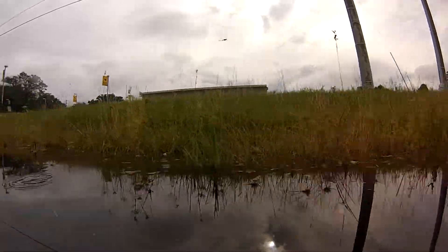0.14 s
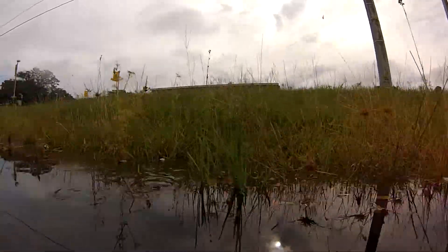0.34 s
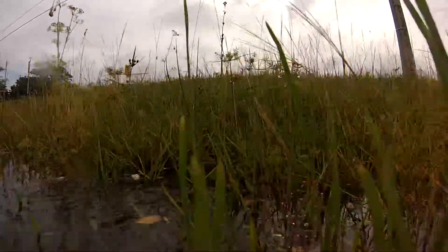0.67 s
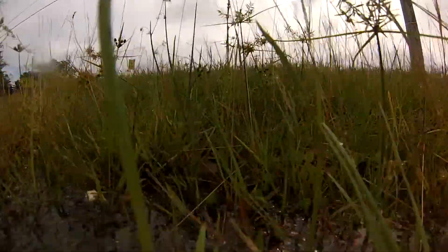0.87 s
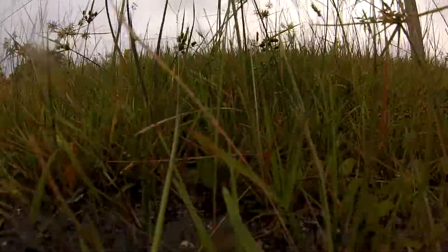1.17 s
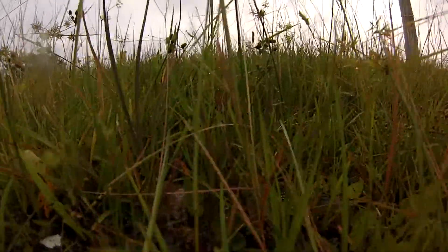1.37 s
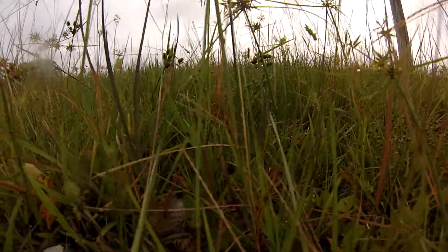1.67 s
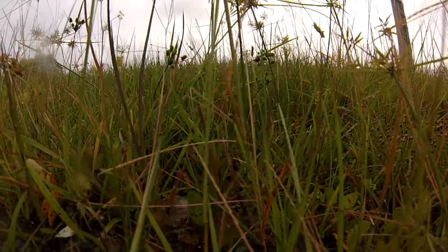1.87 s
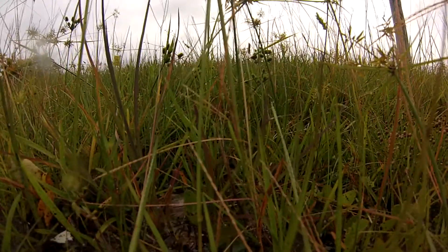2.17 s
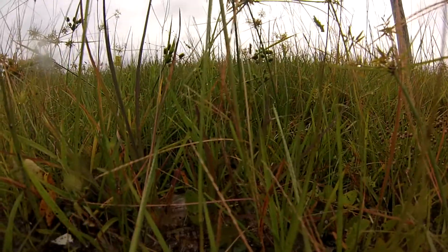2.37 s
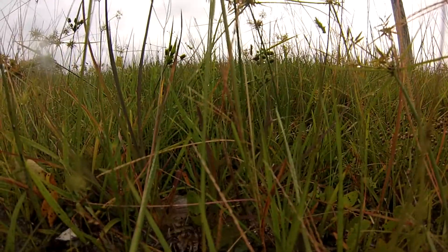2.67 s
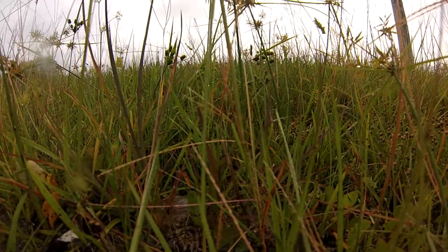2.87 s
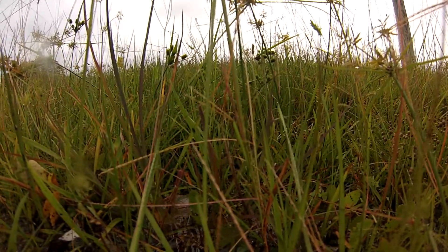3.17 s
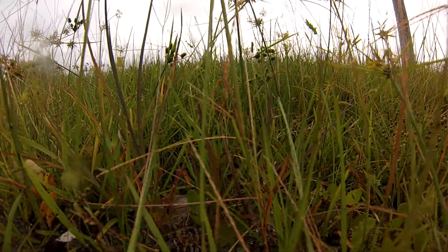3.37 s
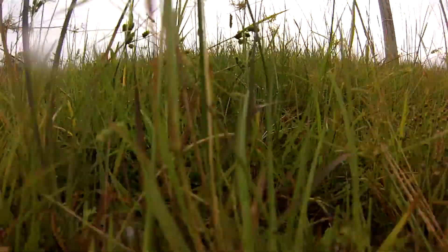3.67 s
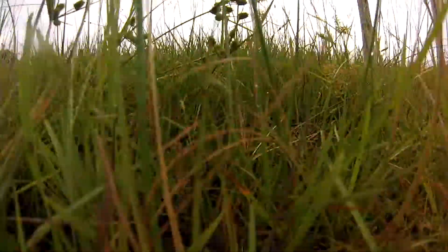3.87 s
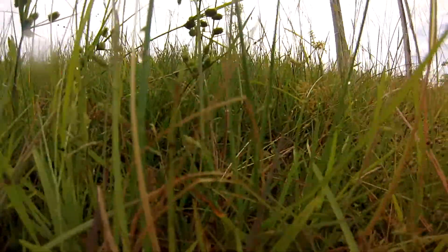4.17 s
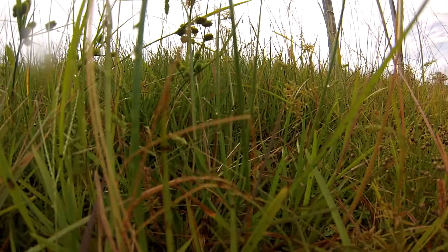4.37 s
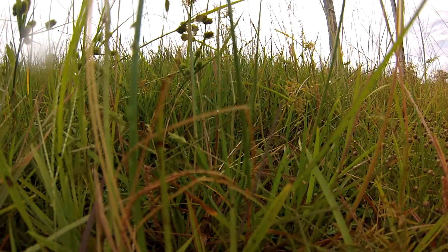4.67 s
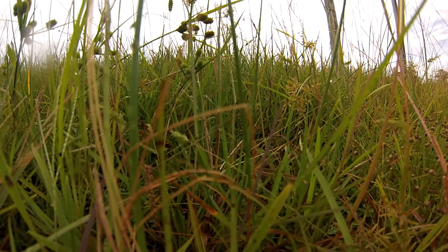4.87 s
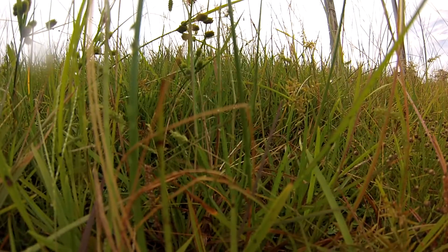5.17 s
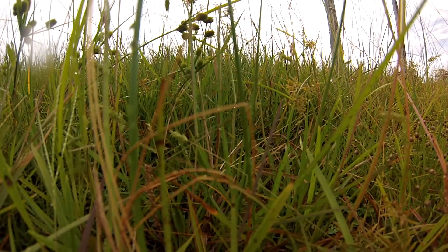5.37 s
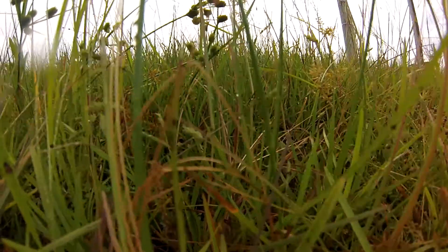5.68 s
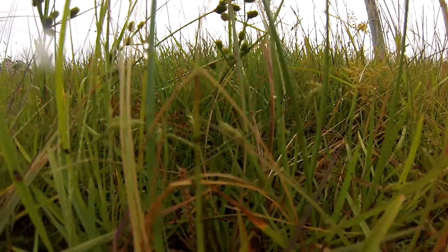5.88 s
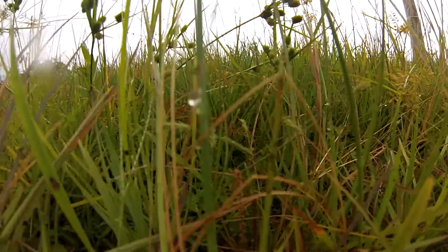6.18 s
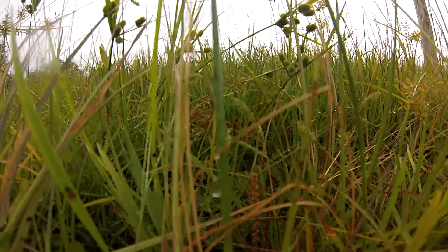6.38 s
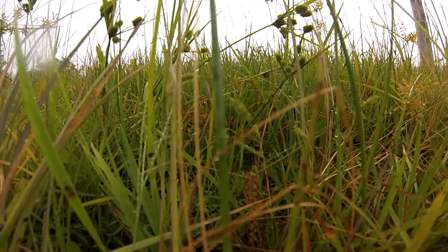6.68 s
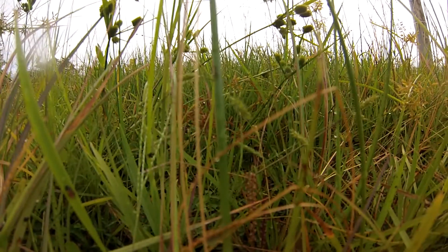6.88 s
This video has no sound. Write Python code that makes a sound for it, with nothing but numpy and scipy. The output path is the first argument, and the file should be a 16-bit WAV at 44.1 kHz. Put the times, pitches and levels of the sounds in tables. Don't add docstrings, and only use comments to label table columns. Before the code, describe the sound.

Outdoors, a small electric fan boat slides off shallow water into grass: bubbly scraping, dense hollow knocks and bright stem flicks, thinning to quiet. A rudder servo whirs twice, the fan motor rattles up into a buzzing whine and coasts down, the servo whirs again, and a second burst follows. The microphone sits in a sealed case on the hull, so everything sounds close, boxy and muffled.

```python
import sys
import numpy as np
from scipy import signal
from scipy.io import wavfile
from scipy.ndimage import uniform_filter1d

SR = 44100
rng = np.random.default_rng(int(sys.argv[2]) if len(sys.argv) > 2 else 0)


def boost(x):
    u = np.asarray(x, float) / 20
    return 10 ** u


def put_to_file(sound):
    columns = np.atleast_2d(sound).T
    safe = np.clip(columns, -1, 1)
    whole_steps = np.round(safe * 32767)
    wavfile.write(sys.argv[1], SR, whole_steps.astype(np.int16))


N = 310464
T = np.arange(N) / SR


def noise(n):
    return rng.standard_normal(n)


def tone(cycles):
    return np.cos(2 * np.pi * cycles)


def evened(x):
    return x / np.sqrt(np.mean(x ** 2) + 1e-20)


def at_speed(speed, table):
    return np.interp(speed, *np.transpose(table))


def read(points, hz):
    f, value = np.transpose(points)
    return np.interp(np.log(hz + 1), np.log(f + 1), value, left=-90, right=-90)


def body(modes, hz):
    return np.sqrt(sum((boost(db) / (1 + (2 * (hz - f) / w) ** 2)) ** 2 for f, w, db in modes))


def hull(hz):
    # pitch_hz [Hz], width_hz [Hz], level_db [dB]
    resonances = [(263, 140, -11.5), (617, 152, -5), (858, 107, -4.5), (1098, 36, -2), (1312.6, 203, 6),
                  (1790, 260, 3), (2136, 200, 4), (2345, 240, 1.5), (2810, 1140, -13), (3730, 130, -14.5),
                  (4760, 100, -25.5), (5440, 1100, -26), (6250, 710, -37.5), (9000, 2600, -58)]
    return body(resonances, hz)


def colour(x, gain):
    log_gain = np.log(gain(abs(np.fft.fftfreq(8192, 1 / SR))) + 1e-5)
    taps = np.fft.ifft(np.exp(np.conj(signal.hilbert(log_gain)))).real[:4096]
    return signal.oaconvolve(x, taps)[:len(x)]


def band(x, lo_hz, hi_hz):
    return signal.sosfilt(signal.butter(3, [lo_hz, hi_hz], "bandpass", fs=SR, output="sos"), x)


def wobble(n, ms):
    size = max(int(ms * SR / 1000), 2)
    return evened(uniform_filter1d(uniform_filter1d(noise(n), size), size))


def span(rows):
    s, *columns = np.transpose(rows)
    part = slice(round(s[0] * SR), min(round(s[-1] * SR), N))
    t = T[part]
    fade = np.clip(np.minimum(t - s[0], s[-1] - t) / 0.0042, 0, 1)
    return part, fade, [np.interp(t, s, c) for c in columns]


def grains(n, per_s, spread_db):
    size = boost(spread_db * np.minimum(rng.exponential(1, n), 4))
    return size * noise(n) * (rng.random(n) < per_s / SR)


def swells(rows, rise_db, fall_db, rest_db):
    humps = [boost(db + np.minimum(rise_db * (T - s), fall_db * (s - T))) for s, db in rows]
    return boost(rest_db) + sum(humps)


def bubbles(n):
    ring_cycles, glide = 10, .22
    out = np.zeros(n)
    for hz in np.geomspace(1000, 2800, num=12):
        u = np.arange(0, 3 * ring_cycles / hz, 1 / SR) * hz / ring_cycles
        bend = 1 + glide * rng.uniform(-1.2, 1) * u
        ring = u * np.exp(-3 * u) * np.sin(2 * np.pi * ring_cycles * u * bend)
        out += signal.oaconvolve(grains(n, 55, 2.8), ring)[:n] * (1500 / hz) ** 0.25
    return evened(out)


def slide():
    # start_s [s], scrape_db [dB]
    drag = [(0.0, -28.5), (0.035, -42), (0.11, -44.5), (0.16, -37), (0.25, -35.5), (0.4, -32.5),
            (0.44, -41), (0.54, -42.5), (0.66, -45.5), (1.07, -38), (1.45, -50), (1.68, -69), (2.12, -77)]
    out, (part, fade, (db,)) = np.zeros(N), span(drag)
    n = len(db)
    scrape = (noise(n) + 0.57 * grains(n, 450, 4.3)) * boost(1.7 * wobble(n, 14))
    froth = boost(-2) * bubbles(n)
    through_hull = evened(colour(scrape, lambda hz: hull(hz) * (hz / 1500 + 0.014) ** -.6))
    spray = evened(band(noise(n), 4000, 7500) + 5 * band(scrape, 3330, 4390))
    out[part] = fade * (boost(db - 1.5) * (froth + through_hull) + boost(db - 24.5) * spray)
    return out


def blows():
    # start_s [s], peak_db [dB], pitch_hz [Hz]
    hull_knocks = [(0.004, -18.5, 1750), (0.008, -21.5, 1050), (1.653, -38.5, 1220), (2.44, -26.5, 1860),
                   (2.12, -26, 1900), (2.4213, -26.5, 1860), (2.5022, -27, 1960), (2.912, -41, 2020),
                   (2.926, -51, 1810), (3.034, -29, 1910), (3.0584, -15.5, 1790), (3.07, -21.5, 1800),
                   (3.1386, -27.5, 2200), (3.17, -23.5, 2200), (3.1799, -25.5, 2200), (3.231, -22.5, 1520),
                   (3.29, -24, 2200), (3.308, -23, 1440), (3.2189, -20.5, 2130), (3.26, -20.5, 1620),
                   (3.332, -29, 2100), (4.121, -18, 2240), (4.328, -36.5, 2060), (4.362, -44.5, 1800),
                   (4.735, -31, 1980), (4.7768, -26, 1910), (4.8284, -27.5, 1960), (5.124, -34, 2460),
                   (5.141, -25.5, 2850), (5.162, -40, 2900), (5.346, -31, 2080), (5.441, -22.5, 2670),
                   (6.7735, -45.5, 1154),
                   (0.0485, -23, 1070), (0.069, -35, 2050), (0.083, -29, 1000), (0.1288, -12, 1360),
             (0.166, -22, 1300), (0.187, -23.5, 1790), (0.2205, -23.5, 1310), (0.245, -27, 1860),
             (0.257, -31, 2500), (0.2677, -20, 1350), (0.29, -28, 1170), (0.3194, -25, 1760),
             (0.343, -21, 1800), (0.352, -23, 1680), (0.375, -18, 1160), (0.4114, -31, 1310),
             (0.4334, -31, 2100), (0.45, -28, 2060), (0.465, -14.5, 1330), (0.4966, -27, 1710),
             (0.5079, -20.5, 1080), (0.556, -29, 1250), (0.565, -21.5, 1300), (0.589, -22.5, 1170),
             (0.6753, -38, 1480), (0.713, -25, 1130), (0.7403, -16.5, 1250), (0.8031, -32.5, 1980),
             (0.829, -28.5, 1350), (0.886, -31, 2160), (0.911, -33, 1340), (0.9518, -32, 1240),
             (1.0241, -37, 1230), (1.068, -23.5, 2530), (1.117, -36, 2170), (1.1473, -24, 2100),
             (1.2088, -32, 1260), (1.2557, -33, 1300), (1.2945, -31.5, 2520), (1.3724, -30, 2960),
             (1.405, -35.5, 1260), (1.4676, -39, 1250), (1.502, -40, 1260)]
    # start_s [s], peak_db [dB], pitch_hz [Hz], fall_by_60_db_s [s], top_end_db [dB]
    case_flicks = [(0.08, -47, 5800, .03, -35), (0.434, -56, 6800, 0.017, -25), (0.47, -53, 6700, .03, -28),
                   (0.617, -52.5, 5000, .03, -27), (1.066, -30.5, 3900, 0.041, -31.5),
                   (1.16, -45, 6000, 0.034, -14), (0.755, -49, 6960, 0.05, -49),
                   (0.952, -46, 4420, 0.069, -26), (0.9857, -34, 4170, 0.26, -39),
                   (1.0202, -43.5, 4500, 0.094, -30.5), (1.058, -31.5, 5200, 0.067, -43),
                   (1.0874, -44, 5200, 0.044, -26), (1.1293, -38.5, 4000, 0.078, -40),
                   (1.1717, -30.5, 5870, 0.0066, -20.5), (1.205, -47, 6400, 0.11, -24),
                   (1.2236, -57, 4880, 0.1, -32), (1.3703, -53, 6100, 0.037, -19)]
    knocks, flicks, u = np.zeros(N), np.zeros(N), T[:3000]
    for s, db, hz in hull_knocks:
        puff = noise(3000) * np.exp(-u / 0.005) * np.minimum(u / 0.0035, 1) ** 2

        def knock_gain(f):
            peak = 0.29 + 1 / (1 + ((f - hz) / 250) ** 2)
            return hull(f) * peak / (1 + (f / 3820) ** 6)
        ring = colour(puff, knock_gain)
        knocks[round((s - .002) * SR):][:3000] += boost(db) * ring / abs(ring).max()
    for s, db, hz, t60, top_db in case_flicks:
        puff = noise(3000) * boost(5 * wobble(3000, 1.5) - 60 * u / t60) * np.minimum(u / .002, 1)
        burst = colour(puff, lambda f: (f > 2500) * (boost(top_db) + 1 / (1 + ((f - hz) / 1800) ** 2)))
        flicks[round(s * SR):][:3000] += boost(db) * burst / abs(burst).max()
    return knocks + flicks


def water():
    # peak_s [s], level_db [dB]
    lurches = [(0.04, -29), (0.16, -26.5), (0.27, -31), (0.4, -22), (0.56, -31), (0.75, -31), (0.94, -34.5),
               (1.17, -32), (1.39, -35.5), (1.88, -52), (2.05, -42), (2.3, -38), (2.48, -32), (2.7, -42.5),
               (3.07, -38), (3.36, -27), (3.68, -33), (3.95, -46), (4.18, -37.5), (4.31, -34.5),
               (4.49, -46.5), (4.72, -48.5), (5.27, -43.5), (5.4, -30.5), (5.6, -36), (5.82, -38),
               (6.0, -33), (6.14, -38), (6.36, -28.5), (6.52, -38.5)]
    # peak_s [s], level_db [dB]
    slaps = [(0.02, -33), (0.15, -29), (0.3, -31), (0.5, -35), (0.75, -37), (0.99, -41), (1.17, -40.5),
             (1.37, -53), (1.73, -58), (2.0, -76), (2.15, -47.5), (2.27, -29), (2.59, -36.5), (2.8, -41.5),
             (4.31, -49), (4.43, -61), (4.8, -49), (4.94, -37), (6.47, -50), (7.02, -48)]
    sway = band(noise(N), 17, 46.7)
    sway /= np.sqrt(uniform_filter1d(sway ** 2, size=3000) + 1e-9)
    slosh = evened(band(np.cumsum(noise(N)), 52, 220)) * boost(2.8 * wobble(N, 40))
    slosh += 0.045 * evened(band(noise(N), 420, 930)) * boost(5.6 * wobble(N, 4.4))
    rocking = swells(lurches, 177.5, 145.5, -55) * evened(sway)
    return rocking + swells(slaps, 212, 182, -94.5) * slosh


def servo():
    # start_s [s], brake_s [s], end_s [s], commutator_hz [Hz], whine_over_gears_db [dB]
    sweeps = [
        (2.112, 2.255, 2.4, 1480, 0),
        (2.415, 2.8, 2.975, 1440, -8),
        (4.662, 5.125, 5.29, 1385, -4),
        (6.928, 7.2, 7.3, 1400, -14),
    ]
    # sag [Hz per s], bend [exponent], waver [share of pitch]
    sags = [(2650, 1, .008), (7400, 3.3, .03), (1500, 1, .006), (2000, 1, .01)]
    loads = [0.9, -1.4, -0.3, -3]
    # free_s [s], lost_db [dB]
    sticks = [
        (2.496, -9),
        (4.82, -10.5),
        (6.954, -0.5),
    ]
    # multiple [of commutator pitch], level_db [dB]
    overtones = [(1, 2), (2, -7), (3, -1), (4, 0), (5, -4), (6, -2)]
    # pitch_hz [Hz], width_hz [Hz], level_db [dB]
    case_modes = [(293, 66, -1.5), (835, 300, -5), (1113, 62, 3), (1350, 590, 0), (1620, 220, 9),
                  (1960, 460, 11.5), (2500, 580, 5), (2840, 125, 5), (3450, 740, -5.5), (3745, 34, -4),
                  (4120, 35, -17.5), (5210, 550, -19.5), (6520, 860, -25), (8070, 600, -28)]
    # pitch_hz [Hz], width_hz [Hz], level_db [dB]
    case_rings = [(3740, 40, -17), (4110, 40, -24)]
    jerk_db, jerk_s = 3, .02
    chatter = noise(N) * boost(1.36 * wobble(N, 2.9)) + 1.6 * grains(N, 900, 2.5)
    chatter = evened(colour(chatter, lambda hz: body(case_modes, hz)))
    for f, w, db in case_rings:
        chatter += boost(db) * evened(band(noise(N), f - w / 2, f + w / 2))
    hz, first = np.ones(N), np.ones(N)
    share, braking, level, twice, waver = np.zeros((5, N))
    for (start, brake, end, top_hz, whine_db), (sag, bend, rough), load_db in zip(sweeps, sags, loads):
        on = (T >= start) & (T < end)
        t = T[on]
        slowing = np.clip((t - brake) / (end - brake), 0, 1)
        held = np.clip((t - brake) / .03, 0, 1)
        spinning = np.exp((start - t) / .022)
        hz[on] = top_hz - 700 * spinning - sag * (end - brake) * slowing ** bend
        share_db = whine_db + (7 - whine_db) * held - 20 * spinning - 9 * slowing ** 3
        if whine_db < 0:
            share_db -= 10 * np.exp((start - t) / .2)
        share[on] = boost(share_db)
        braking[on] = np.maximum(held * boost(whine_db), .9 * (brake > 5))
        first[on] = boost(-5 * held - 5 * slowing)
        fall_db = -19 * np.clip(1 - (end - t) / 0.047, 0, 1)
        jerk = jerk_db * np.exp((start - t) / jerk_s)
        level[on] = np.minimum((t - start) / 0.03, 1) * boost(load_db - 39 + fall_db + jerk)
        twice[on] = held
        waver[on] = .007 + (rough - .007) * held
    for s, db in sticks:
        stuck = db * np.clip(1 - (s - T) / 0.033, 0, 1) * (T < s)
        level *= boost(stuck + jerk_db * np.exp(-abs(T - s) / jerk_s) * (T >= s))
    level = uniform_filter1d(level, size=90)
    cycles = np.cumsum(hz * (1 + waver * wobble(N, 2.5))) / SR
    whine = np.zeros(N)
    for k, db in overtones:
        line = boost(db + 3.0 * wobble(N, 5)) * body(case_modes, k * hz) * tone(k * cycles)
        if k == 1:
            line *= first
        elif k == 2:
            line *= boost(6 * twice)
        else:
            line *= braking
        whine += line
    return level * (boost(2 * twice) * chatter + share * whine) / np.sqrt(1 + share ** 2)


def shaft(t, burst, climb):
    # after_s [s], speed [turns per s]
    coast_down = [(-.12, 144), (-.052, 138.6), (0, 129), (.1, 108), (.18, 85.5), (.225, 65), (.26, 54),
                  (.4, 25), (.6, 12)]
    (start, catch, freed, rest), (top, lag, knee, slowness) = burst, climb
    blend = 7
    creeping, surge = 17.7 + 19 * (t - start), 5 + 900 * (t - catch)
    launch = 2 * blend * np.logaddexp(creeping / blend / 2, surge / blend / 2)
    easing = top - 40 * np.exp((knee - np.maximum(t, catch)) / lag) + 99 * (t < catch + .07)
    driven = -blend * np.logaddexp(-launch / blend, -easing / blend)
    coast = at_speed((t - freed) / slowness, coast_down)
    free = uniform_filter1d(1. * (coast < driven), size=2000)
    return uniform_filter1d(np.minimum(driven, coast), size=900), free


def law(speed, free, pulling, coasting):
    up, down = np.transpose(pulling), np.transpose(coasting)
    return [(1 - free) * np.interp(speed, up[0], a) + free * np.interp(speed, down[0], b)
            for a, b in zip(up[1:], down[1:])]


def order(turns, k, waver_db):
    level = boost(waver_db * wobble(len(turns), 20))
    return level * np.sqrt(2) * tone(k * turns + .3 * rng.random())


def mount_shake(turns, speed, free, twice_db):
    # speed [turns per s], once_a_turn_db [dB], twice_a_turn_db [dB]
    mount = [(18.1, -67, -47.5), (39.2, -45.5, -38), (60.8, -20, -62), (87, -15.5, -42.5), (88, -16, -32.5),
             (109.5, -17, -30), (118.4, -24, -35), (126.4, -32, -29)]
    at, once_db, two_db = np.transpose(mount)
    shake = boost(np.interp(speed, at, once_db)) * order(turns, 1, 1.0)
    return shake + boost(np.interp(speed, at, two_db) + twice_db + 3 * free) * order(turns, 2, 0.38)


def shaft_lines(turns, speed, free, spun, orders):
    slack = speed.max() - speed
    clean_db = -0.5 - 0.5 * slack * (1 - free + free * 0.69)
    lines = 0
    for k, db in orders[2:]:
        kept_db = (k < 6) * 0.6 * (1 - free) * (-0.5 - clean_db)
        lost_db = (k > 10) * .25 * free * slack
        lines = lines + boost(db + kept_db - lost_db) / hull(k * speed.max()) * order(turns, k, 1.2)
    return boost(clean_db) * evened(colour(spun * lines, hull))


def magnet_whine(turns, speed, free, spun, powered):
    # multiple [of shaft speed], level_db [dB]
    poles = [(42, 0), (84, -4), (126, -15), (168, -19)]
    # speed [turns per s], level_db [dB]
    wrench = [(26, 10), (32, 13), (40, 7), (50, -3), (62, -6), (72, -6), (85, 0)]
    # speed [turns per s], level_db [dB]
    whine_pulling = [(25, -68), (29, -50), (32, -25), (44, -21), (52, -14), (56, -14), (63, -21), (80, -27),
                     (92, -36), (100, -54), (107, -55), (115, -41), (142, -56)]
    # speed [turns per s], level_db [dB]
    whine_coasting = [(25, -80), (61, -60), (68, -42), (80, -42), (85, -68), (110, -72), (129, -53),
                      (142, -57)]
    whine_db = law(speed, free, whine_pulling, whine_coasting)[0]
    heave = powered * (1 - .9 * spun) * boost(at_speed(speed, wrench))
    swell = 1 + (.9 - .7 * spun) * tone(2 * turns)
    pull = boost(whine_db) * swell * boost(1.5 * wobble(len(turns), 3)) / hull(42 * speed)
    lines = sum(boost(db) * order(turns, k, 1.3) * (heave if k > 42 else 1) for k, db in poles)
    return colour(pull * lines, hull)


def coil_hum(t, turns, speed, free, spun, cut_s, hum_db):
    # speed [turns per s], level_db [dB]
    hum_rise = [(95, -31), (108, 3), (120, 0), (126, -13), (133, 1), (140, -2)]
    # multiple [of shaft speed], resonance_hz [Hz], power_db [dB], coasting_db [dB]
    crossings = [(12, 1350, -43, -26), (13, 1358, -21, -27.5), (14, 1200, -26, -29.5),
                 (13, 1740, -29, -36.5), (14, 1800, -30.5, -32)]
    hum = boost(hum_db + at_speed(speed, hum_rise)) * np.clip((cut_s - t) / .03, 0, 1)
    hum = hum * order(turns, 21, 2)
    for k, hull_hz, db, free_db in crossings:
        nearness = 1 / (1 + ((k * speed - hull_hz) / 110) ** 2) ** 2
        hum += spun * boost(db + (free_db - db) * free) * nearness * order(turns, k, 1.8)
    return hum


def loose_rattle(speed, gate, upper_db, settled):
    n = len(speed)
    rattle = colour(gate * noise(n), hull)

    def low_pass(hz):
        return 1 / (1 + (hz / 2700) ** 12)

    def lower_gain(hz):
        frame = 1 + 1 / (1 + ((hz - 2200) / 150) ** 2)
        return np.clip(hz / 1100, .3, 1) * frame * low_pass(hz)
    lower = evened(colour(rattle, lower_gain))
    upper = evened(colour(rattle, lambda hz: 1 - low_pass(hz)))
    caught = np.clip((np.maximum.accumulate(speed) - 23) / 12, 0, 1)
    buzz = evened(band(rattle, 2750, 3500) + boost(-38) * band(gate * noise(n), 4600, 5800))
    upper = (1 - caught) * buzz + caught * upper
    rustle = evened(band(gate * noise(n), 450, 2000))
    return boost(-4.5) * lower + boost(upper_db - 14.5) * upper + settled * boost(-6.5) * rustle


def propeller_air(gate):
    # pitch_hz [Hz], level_db [dB per Hz]
    air_colour = [(1650, -43), (2800, -32), (2880, 8), (3050, -23.5), (3140, 1), (4560, -13), (7360, -14.5),
                  (7960, -16.5), (15500, -38.5)]
    return evened(colour((0.84 + gate) * noise(len(gate)), lambda hz: boost(read(air_colour, hz))))


def low_shudder(free):
    n = len(free)
    shudder = band(noise(n), 84, 116.3) + 0.4 * (1 - free + 0.58 * free) * band(noise(n), 191, 309)
    shudder += 0.041 * band(noise(n), 340, 690)
    return evened(shudder) * boost(2.5 * wobble(n, 20))


def chopping(part, turns, speed, chop, beat_db):
    inner, fade, (db,) = span([chop[::2], chop[1:]])
    hz = 7730 + 95 * np.exp((chop[0] - T[inner]) / .12)
    cycles = np.cumsum(hz) / SR
    local = slice(inner.start - part.start, inner.stop - part.start)
    reached = np.maximum.accumulate(speed)[local]
    presence = np.interp(reached, [92, 100, 116, 124], [0, 1, 1, 0])
    beat = colour(boost(beat_db) * presence * tone(cycles - 42 * turns[local]), hull)
    whistle = boost(db + 0.81 * wobble(len(hz), 13.0)) * np.sqrt(2) * tone(cycles)
    return inner, fade * (whistle + beat)


def motor(burst, climb, orders, trim, chop):
    # speed [turns per s], rattle_db, upper_over_rattle_db, air_db, shudder_db [dB]
    pulling = [(17.3, -48.5, 8, -98, -43), (18.36, -34.5, 9, -84, -34), (21.6, -32.5, -5.5, -83.5, -44),
               (24.5, -29, -23.5, -78, -44), (34.6, -23.5, 1, -61.5, -42), (57.3, -19, -5, -66, -44.5),
               (98, -23, -10, -58, -38.5), (153, -21.5, -4, -50, -43)]
    # speed [turns per s], rattle_db, upper_over_rattle_db, air_db, shudder_db [dB]
    coasting = [(12, -42, -17, -88, -78), (24.8, -39.5, -29, -89, -55), (44, -35, -44, -90, -40),
                (59, -26.5, -39, -78, -40), (67.6, -19.5, -37, -68, -30), (92.5, -22.5, -13.5, -65, -30.5),
                (142, -22, -2, -51, -36)]
    out, (part, fade, _) = np.zeros(N), span([burst[:1], burst[3:]])
    twice_db, cut_s, hum_db, beat_db = trim
    t = T[part]
    speed, free = shaft(t, burst, climb)
    rattle_db, upper_db, air_db, shudder_db = law(speed, free, pulling, coasting)
    turns = np.cumsum(speed * (1 + .0025 * wobble(len(t), 6))) / SR
    spun = np.clip((speed - 60) / 40, 0, 1)
    strength = boost(1.5 * noise(int(turns[-1]) + 1))[turns.astype(int)]
    gate = 0.6 + strength * np.exp(-(turns % 1) / 0.4)
    settled = (t > cut_s) * np.clip((51 - speed) / 3, 0, 1)
    level = boost(rattle_db - 10 * settled)
    sound = level * loose_rattle(speed, gate, upper_db, settled)
    sound += level * shaft_lines(turns, speed, free, spun, orders)
    sound += magnet_whine(turns, speed, free, spun, t < cut_s)
    sound += coil_hum(t, turns, speed, free, spun, cut_s, hum_db)
    sound += mount_shake(turns, speed, free, twice_db)
    sound += boost(air_db + 12.5) * propeller_air(gate)
    sound += boost(shudder_db) * low_shudder(free)
    out[part] = sound * fade * np.minimum((burst[3] - t) / .1, 1)
    inner, chopped = chopping(part, turns, speed, chop, beat_db)
    out[inner] += chopped
    return out


def fan():
    # creep_s [s], catch_s [s], coasting_through_129_turns_per_s_s [s], rest_s [s]
    bursts = [
        (3.025, 3.337, 3.9, 4.5),
        (5.115, 5.427, 6.076, 6.49),
    ]
    # top [turns per s], lag_s [s], when_40_below_top_s [s], coast_slowness [factor]
    climbs = [(145, .19, 3.487, 1), (142.3, .083, 5.54, 1.075)]
    # multiple [of shaft speed], level_db [dB]
    orders_heard = [
        [(1, -11), (2, -6), (3, -7.5), (4, -18), (5, -23.5), (6, -14), (7, -15.5), (8, -12), (9, -36.5),
         (10, -10), (11, -11), (12, -20), (13, 1.5), (14, -10.5), (15, -31), (16, -28.5), (17, -3), (18, -31),
         (19, -28), (20, -25.5)],
        [(1, -5), (2, 0), (3, -2), (4, -0.5), (5, -19.5), (6, 2.5), (7, -8), (8, -3.5), (9, 2.5), (10, -1),
         (11, -11), (12, -4.5), (13, 1.5), (14, -12), (15, 3.5), (16, -28), (17, -5.5), (18, -5), (19, -30),
         (20, -45)],
    ]
    # twice_a_turn_db [dB], throttle_cut_s [s], coil_hum_db [dB], chop_magnet_beat_db [dB]
    trims = [(-3, 3.885, -32, -22), (4, 6.065, -35, -46)]
    # start_s [s], end_s [s], level_db [dB]
    chops = [
        (3.33, 3.95, -51),
        (5.42, 6.165, -54),
    ]
    return sum(motor(*burst) for burst in zip(bursts, climbs, orders_heard, trims, chops))


def creep():
    # start_s [s], pitch_hz [Hz], level_db [dB]
    stepping = [
        [(3.15, 490, -64), (3.22, 530, -53), (3.3, 582, -47), (3.35, 630, -54)],
        [(5.3, 465, -62), (5.35, 510, -53), (5.43, 600, -52)],
    ]
    # multiple [of step pitch], level_db [dB]
    step_lines = [(5, 1), (6, -10), (10, -31)]
    out = np.zeros(N)
    for rows in stepping:
        part, fade, (hz, level_db) = span(rows)
        cycles = np.cumsum(hz * (1 + .004 * wobble(len(hz), 6))) / SR
        out[part] = fade * boost(level_db) * sum(boost(db) * tone(k * cycles) for k, db in step_lines)
    return np.sqrt(2) * out


def servo_ticks():
    # start_s [s], end_s [s], level_db [dB]
    twitches = [
        (4.201, 4.47, -60),
        (6.4216, 6.92, -54),
    ]
    kicks = np.zeros(N)
    for start, end, db in twitches:
        at = (np.arange(start, end, .02199) * SR).astype(int)
        kicks[at] = boost(db + 1.2 * noise(len(at)))
    u = T[:600]
    twitch = band(np.exp(-u / .0025) * (.4 * noise(600) + 8 * (u == 0)), 1700, 2900)
    return signal.oaconvolve(kicks, 2.5 * twitch / abs(twitch).max())[:N]


def scene():
    return (slide() + blows() + water() + servo() + fan() + creep() + servo_ticks())[None]


def microphone_hiss():
    # pitch_hz [Hz], level_db [dB per Hz]
    hiss_colour = [(59, -24), (100, -1), (347, -15.5), (998, -21.5), (1290, -10), (1490, -21.5),
                   (2130, -17), (2750, -25), (11800, -33.5), (15500, -41.5)]
    hiss = colour(noise(N), lambda hz: boost(read(hiss_colour, hz)))
    return hiss * boost(-70) / np.std(band(hiss, 3000, 15500))


def top_cut(x):
    return signal.sosfilt(signal.butter(12, 15400, fs=SR, output="sos"), x)


def record(dry):
    return top_cut(dry + microphone_hiss())


dry = scene()
out = record(dry)
put_to_file(out)
```